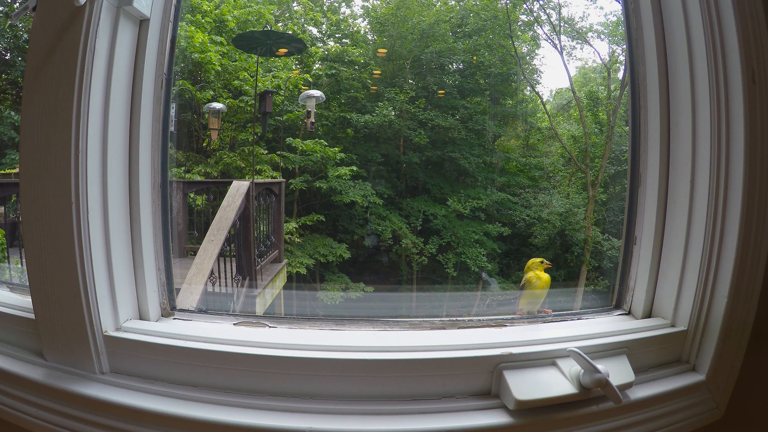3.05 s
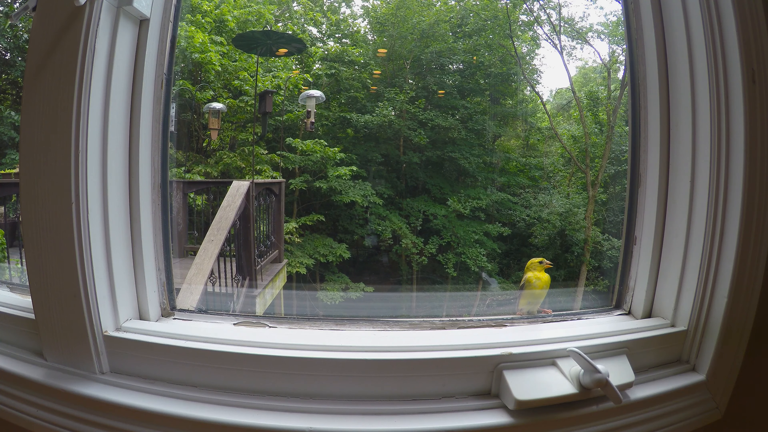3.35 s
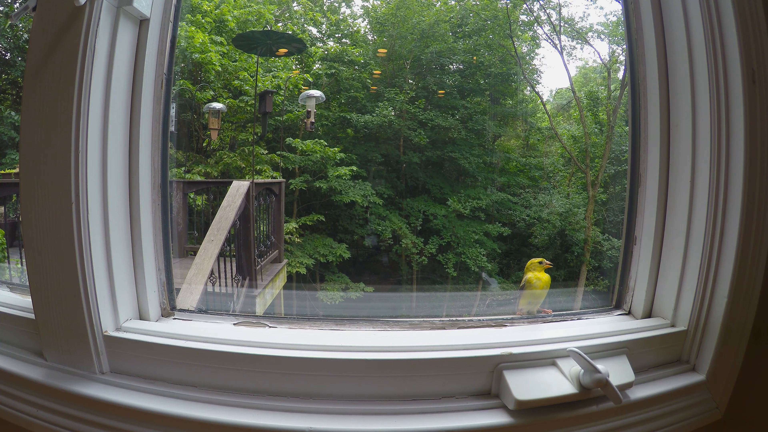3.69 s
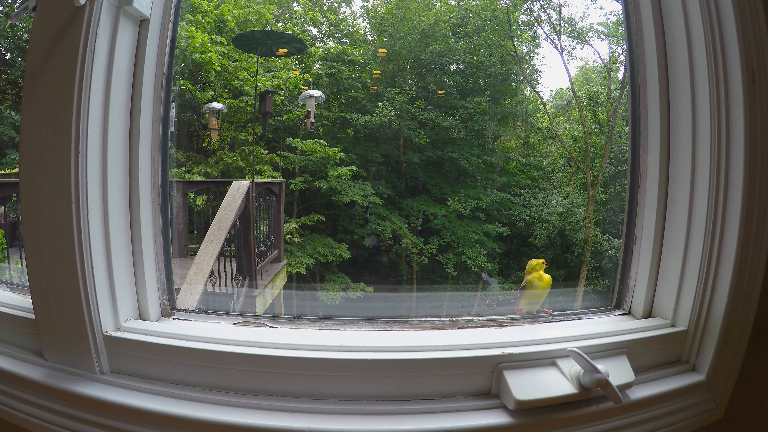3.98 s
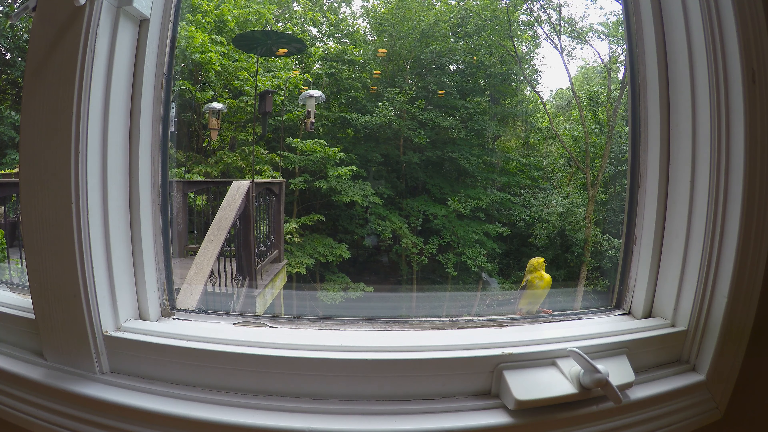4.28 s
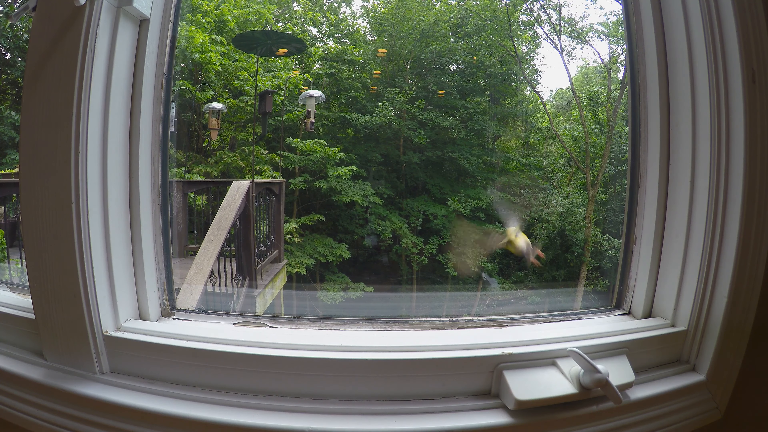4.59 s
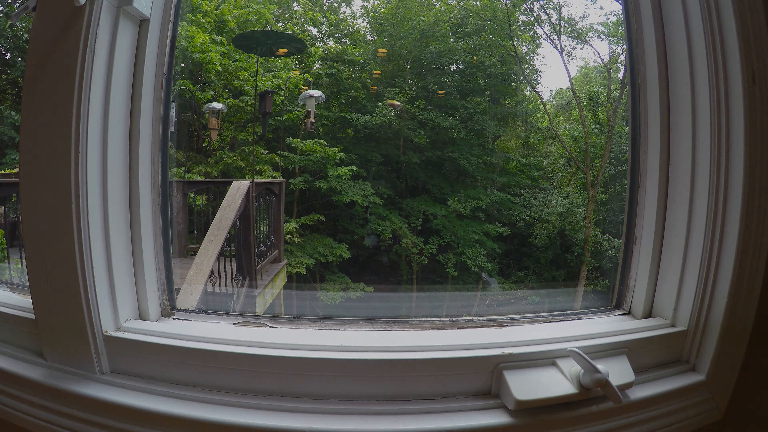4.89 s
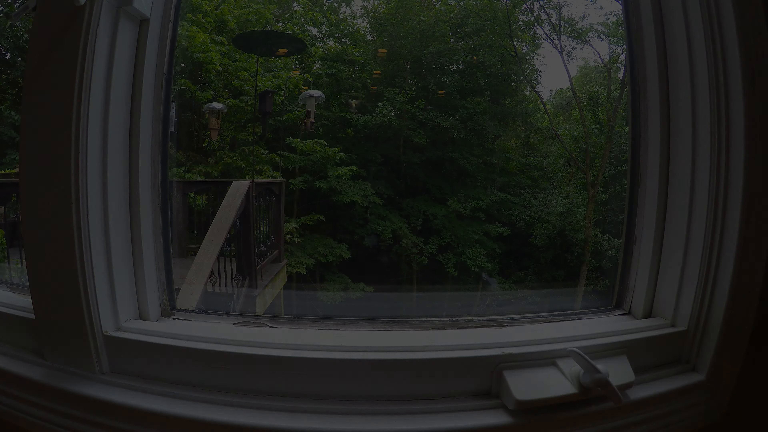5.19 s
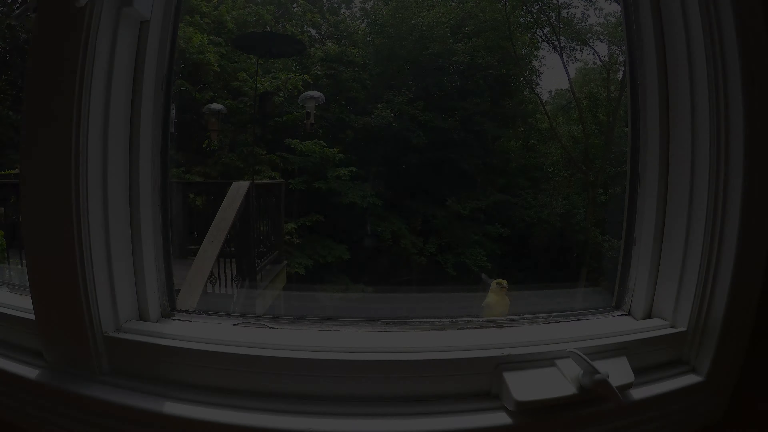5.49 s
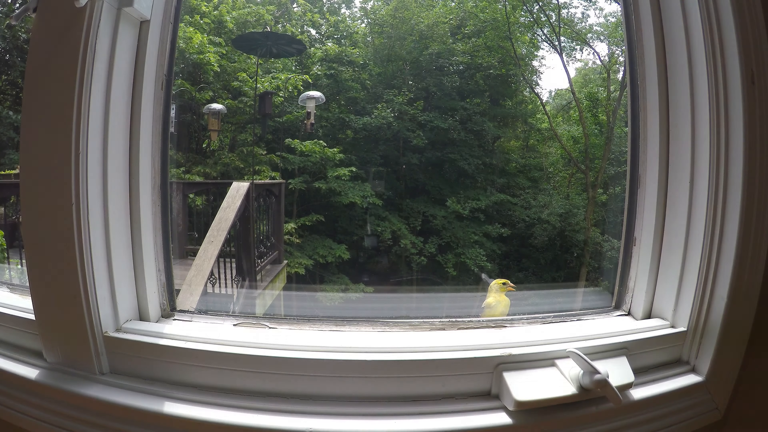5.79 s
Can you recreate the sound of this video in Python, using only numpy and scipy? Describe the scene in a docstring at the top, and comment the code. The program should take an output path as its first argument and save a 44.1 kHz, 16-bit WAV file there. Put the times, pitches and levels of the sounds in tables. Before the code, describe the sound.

A small bird pecks at a windowpane from outside, heard from a quiet room behind the glass. Each peck is a sharp, bright click with a faint ring of the pane and a short room tail, and the strength varies from tap to tap. Four quick pecks come right at the start, three more at about 0.5 seconds and another three just before 1 second. After a pause of a second, three rapid pecks land at about 2 seconds, followed by four at around 2.3 to 2.4 seconds. One faint single tap comes at 3.3 seconds. Underneath runs a soft, steady ventilation rumble with light hiss and a low appliance hum. This background continues alone, fades out from about 4.9 seconds to a brief silence at 5.4 seconds, then fades straight back in.

```python
"""Bird pecking at a window

A small bird pecks the pane from outside, heard from the quiet room behind it. Each peck: a click,
bending waves returning from the frame (treble first), the ring of the glass, a short room tail.
Ventilation rumbles and an appliance hums. Near the end all sound fades out and starts back in."""
import sys
import numpy as np
from scipy import signal
from scipy.fft import rfft, irfft
from scipy.io import wavfile

SR = 44100
rng = np.random.default_rng(int(sys.argv[2]) if len(sys.argv) > 2 else 0)


def digitize_waveform(pressure):
    """Quantize a signal to 16-bit integers and store it at the path in sys.argv[1].

    Rows of a 2-D input are taken as channels; values are limited to [-1, 1].
    """
    field = np.atleast_2d(pressure).T
    bounded = np.clip(field, -1, 1)
    quanta = np.round(bounded * 32767).astype(np.int16)
    wavfile.write(sys.argv[1], SR, quanta)


N = 257103
SIZE = 32768  # samples per peck response
AGE_S = np.arange(SIZE) / SR
FREQS_HZ = np.fft.rfftfreq(SIZE, 1 / SR)
CUTOFF_HZ = 15400

# beak on glass: (time [s], strength [dB], extra thump [dB], extra ping [dB], extra sharpness [dB])
BEAK_HITS = [(0.0714, -10, 1.5, 5, -4), (.1364, -16, 1.5, 0, 1), (0.1574, -6, 1, 4, -3),
             (.201, -4, -4, -.5, -6), (0.4863, -2, -6, -5.5, -9), (0.5077, -6.5, 3, -2, 0.5),
             (0.536, -23, -11, 8, 9), (0.901, -19, -1, 3.5, -4), (.9501, 1.5, -3.5, -6.5, -3.5),
             (.9817, -5, 0.5, 3.5, 1.5), (2.0287, -9.5, -4, 3.5, -12), (2.0487, -3.5, 0, 0, -4),
             (2.0786, -2, -0.5, 1.5, -0.5), (2.2948, -5.5, -7.5, -13, -1), (2.337, -22, 8, 0, -5),
             (2.356, -4, 2, 3, -3.5), (2.387, 0, 0, 0.5, -2), (3.313, -22, -2, 3, -11)]
# radiation at the contact point: (frequency [Hz], gain [dB])
CLICK_SPECTRUM = [(120, -35), (380, -2.5), (850, -7.5), (1200, -17), (2600, -14), (3500, -15),
                  (4000, -26.5), (4800, -14), (5600, -21.5), (6600, -23), (7600, -34), (11200, -27),
                  (15000, -40)]
# short bright ping of each peck's click: (frequency [Hz], width [Hz], boost [dB])
PING_BANDS = [(3452, 75, 13), (4820, 250, -1.5), (6230, 250, 6)]
# radiation as a bending wave reaches the frame: (frequency [Hz], gain [dB])
EDGE_SPECTRUM = [(200, -49), (500, -9.5), (1000, -10), (1300, -7), (1800, -12.5), (2500, -17), (3900, -22),
                 (4600, -16.5), (5500, -18), (6400, -13), (7300, -25), (8200, -28.5), (10200, -29.5),
                 (13000, -40)]
# shortest paths to the four frame sides: (travel time at 1 kHz [s], gain [dB])
FIRST_PATHS = [(.0105, -10), (0.0115, -0.5), (0.0126, -10), (.0158, -4.5)]
# ring of the pane: (frequency [Hz], relative level [dB], t60 [s])
GLASS_MODES = [(238, -4, .42), (293, -1, .42), (324, -3, .35), (362, -4, .42), (433, 0, .42),
               (454, -5, .35), (518, 0, .42), (580, -1, .42), (657, -4, .42), (715, -3, .41),
               (781, -3, .39), (849, -4, .37), (915, -2, .35), (982, -10, .33), (1035, -12, .32),
               (1143, -8, .3), (1213, -8, .29), (1401, -11, .26), (1483, -12, .25), (1685, -13, .23),
               (1856, -12, .21)]
# diffuse room tail: (frequency [Hz], band gain [dB], t60 [s])
ROOM_BANDS = [(150, -24, 0.4), (398, 4, 0.46), (890, -4, 0.43), (1790, -10.5, 0.4), (3540, -23.5, 0.54),
              (6200, -24.5, 0.6), (8100, -33.5, 0.23), (15000, -40, 0.13)]
# ventilation rumble and hiss: (frequency [Hz], relative density [dB])
AIR_SPECTRUM = [(10, -32.5), (22, 3), (45, -1), (112, -2), (140, -10.5), (250, -13), (350, -23), (550, -26),
                (700, -27), (1000, -31), (1500, -36.5), (3000, -38), (6000, -42.5), (15000, -51.5)]
# appliance hum: (frequency [Hz], rms level [dB])
HUM_TONES = [(59.5, -55), (79, -65.5), (100, -55.5), (114, -58), (173.5, -62), (240, -64), (404.5, -70),
             (579, -77.5), (628, -71.5), (637, -72.5), (831, -83.5), (1077, -83), (1359, -90), (2432, -84),
             (2488, -82), (3128, -91), (3183, -85.5)]


def pecks(thump_hz=1200, ping_hz=3420, bright_hz=6000, sharp_hz=9000, near_s=0.001175):
    """Every peck drives the same window; contact hardness tilts its colour."""
    click = causal(CLICK_SPECTRUM) * pings() * bending(near_s)
    echoes, tail = frame_echoes(), room_tail()
    out = np.zeros(N + SIZE)
    for time_s, strength_db, thump_db, ping_db, sharp_db in BEAK_HITS:
        contact = causal([(thump_hz, thump_db), (ping_hz, ping_db), (bright_hz, 0), (sharp_hz, sharp_db)])
        snap = click * smear(share=0.4, above_hz=5500) + echoes * smear(share=0.55, above_hz=2800)
        start = round(time_s * SR)
        out[start:start + SIZE] += from_db(strength_db) * irfft(contact * (snap + pane_ring() + tail))
    return out[:N]


def pings():
    """Narrow resonances lift the click into a ping of a few milliseconds."""
    return 1 + sum((from_db(boost_db) - 1) / (1 + 2j * (FREQS_HZ - hz) / width_hz)
                   for hz, width_hz, boost_db in PING_BANDS)


def bending(travel_s):
    """Glass path taking travel_s at 1 kHz; wave speed grows with the root of frequency."""
    return np.exp(-4j * np.pi * travel_s * np.sqrt(1000 * FREQS_HZ))


def frame_echoes(next_s=0.018, last_s=0.072, later_db=-6.5, loss_db_per_s=403, count=20):
    """Strong falling chirps from the frame, then weaker ones that have crossed the pane again."""
    travel_s = next_s + (last_s - next_s) * (np.arange(count) + rng.random(count)) / count
    gains = from_db(later_db - loss_db_per_s * (travel_s - next_s)) * rng.choice([-1, 1], count)
    first = sum(from_db(db) * bending(s) for s, db in FIRST_PATHS)
    later = sum(gain * bending(s) for gain, s in zip(gains, travel_s))
    return causal(EDGE_SPECTRUM) * (first + later)


def smear(share, above_hz, decay_s=0.0028):
    """Short waves radiate from many spots of the pane, blurring the treble anew on each peck."""
    scatter = rng.standard_normal(SIZE) * np.exp(-AGE_S / decay_s)
    blurred = share * FREQS_HZ ** 4 / (FREQS_HZ ** 4 + above_hz ** 4)
    return np.sqrt(1 - blurred) + np.sqrt(blurred) * rfft(scatter) / np.linalg.norm(scatter)


def pane_ring(ring_db=-47.5, spread_db=2.5, build_s=0.0032):
    """Low modes build as waves fill the pane, then beat; their weights vary per peck."""
    hz, level_db, t60_s = np.transpose(GLASS_MODES)[:, :, None]
    gains = from_db(level_db + ring_db + spread_db * rng.standard_normal(hz.shape))
    modes = gains * decay(t60_s) * np.sin(2 * np.pi * hz * AGE_S)
    build = 1 - np.exp(-AGE_S / build_s)
    return rfft(build * modes.sum(axis=0))


def room_tail(build_s=0.0072, bands=18):
    """Scattered reflections build up, then die band by band, the top treble first."""
    white, tail = rfft(rng.standard_normal(SIZE)), 0
    build = 1 - np.exp(-(AGE_S / build_s) ** 2)
    edges_hz = np.geomspace(100, CUTOFF_HZ, bands + 1)
    for low_hz, high_hz in zip(edges_hz, edges_hz[1:]):
        hz = np.sqrt(low_hz * high_hz)
        envelope = build * decay(at_hz(ROOM_BANDS, hz, column=2))
        band = irfft(white * (FREQS_HZ >= low_hz) * (FREQS_HZ < high_hz))
        tail += from_db(at_hz(ROOM_BANDS, hz)) * band * envelope / np.linalg.norm(envelope)
    return rfft(tail)


def ventilation(rms_db=-47.5):
    """Steady rumble of moving air, thinning into a smooth hiss."""
    colour = from_db(at_hz(AIR_SPECTRUM, np.fft.rfftfreq(N, 1 / SR)))
    air = irfft(rfft(rng.standard_normal(N)) * colour, N)
    return from_db(rms_db) * rms_one(air)


def appliance_hum(waver=0.27, waver_hz=6.1, rumble_waver=0.71, rumble_below_hz=130):
    """Motor tones waver in level and phase, the lowest most."""
    t, out = np.arange(N) / SR, 0
    for hz, level_db in HUM_TONES:
        depth = rumble_waver if hz < rumble_below_hz else waver
        phase = 2 * np.pi * (hz * t + rng.random())
        in_phase = (1 + depth * drift(waver_hz)) * np.sin(phase)
        quadrature = depth * drift(waver_hz) * np.cos(phase)
        out += from_db(level_db) * rms_one(in_phase + quadrature)
    return out


def fader(bottom_s=5.44, ramp_s=0.51, mute_from_s=5.426, mute_to_s=5.476):
    """Linear fade to a short silence, then back up at the same pace."""
    t = np.arange(N) / SR
    sounding = (t < mute_from_s) | (t > mute_to_s)
    return np.minimum(np.abs(t - bottom_s) / ramp_s, 1) * sounding


def from_db(db):
    """Decibels to gain."""
    return 10 ** (np.asarray(db) / 20)


def rms_one(x):
    """Scale to rms 1."""
    return x / np.sqrt(np.mean(x ** 2) + 1e-20)


def decay(t60_s):
    """Envelope falling 60 dB in t60_s."""
    return np.exp(-np.log(1000) * AGE_S / t60_s)


def at_hz(table, hz, column=1):
    """Interpolate a table column along log frequency."""
    table = np.array(table)
    return np.interp(np.log(np.maximum(hz, 1)), np.log(table[:, 0]), table[:, column])


def causal(curve):
    """Minimum-phase response of a (frequency [Hz], gain [dB]) curve: no sound before the blow."""
    cepstrum = irfft(np.log(from_db(at_hz(curve, FREQS_HZ))))
    cepstrum[1:SIZE // 2] *= 2
    cepstrum[SIZE // 2 + 1:] = 0
    return np.exp(rfft(cepstrum))


def drift(corner_hz, points=2048):
    """Slow random wander, rms 1."""
    hz = np.fft.rfftfreq(points, N / SR / points)
    slow = irfft(rfft(rng.standard_normal(points)) / (1 + (hz / corner_hz) ** 2))
    return np.interp(np.linspace(0, points - 1, N), np.arange(points), rms_one(slow))


def scene():
    """Pecks over the room background, mono."""
    return (pecks() + ventilation() + appliance_hum())[None]


def record(dry):
    """Fader dip, then a steep low-pass."""
    low_pass = signal.ellip(12, 0.1, 80, CUTOFF_HZ, fs=SR, output="sos")
    return signal.sosfilt(low_pass, dry * fader())


dry = scene()
out = record(dry)
digitize_waveform(out)
```